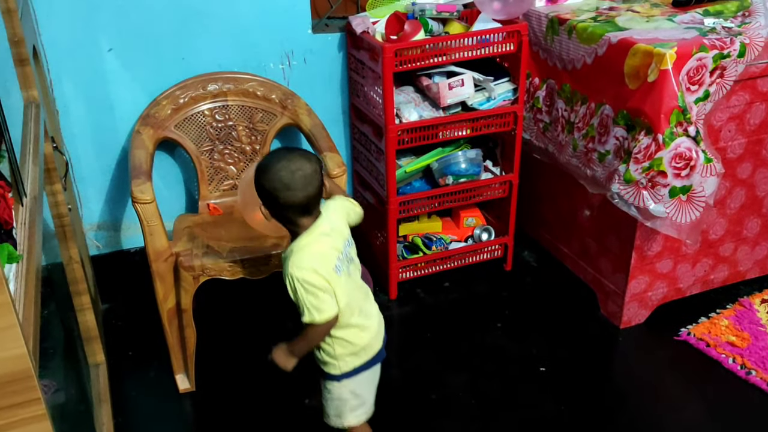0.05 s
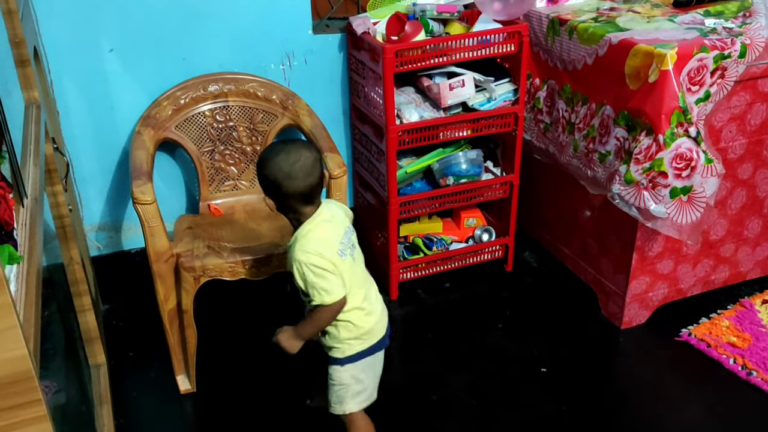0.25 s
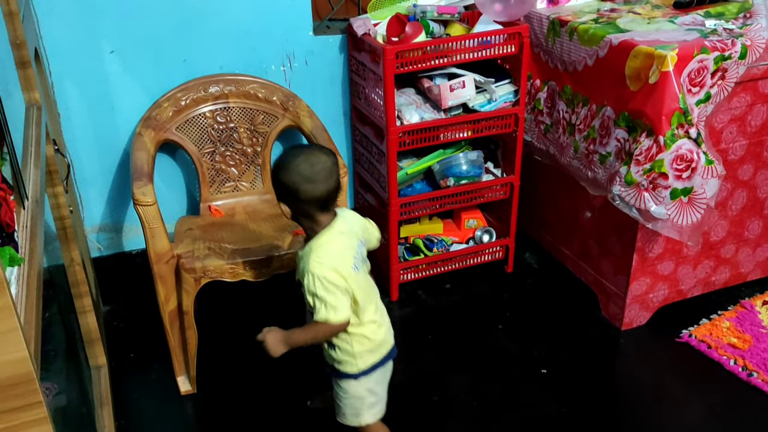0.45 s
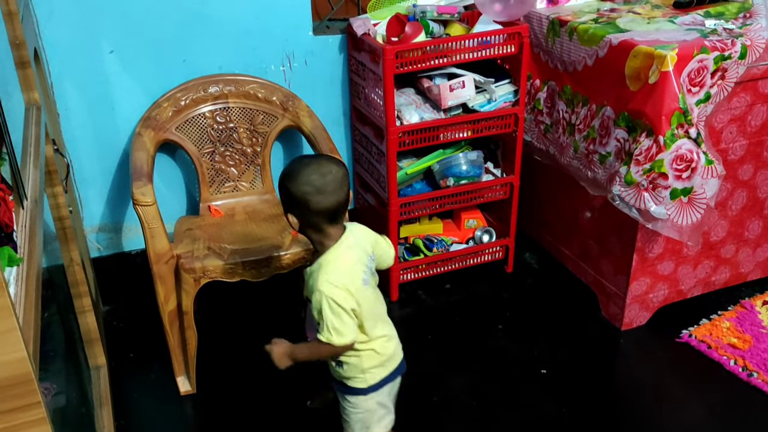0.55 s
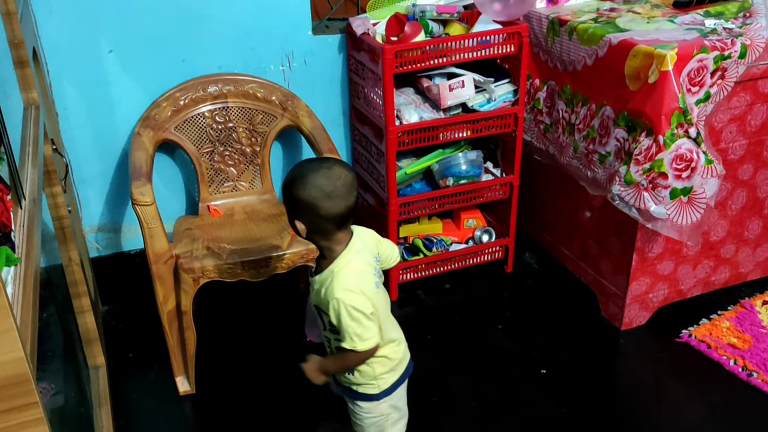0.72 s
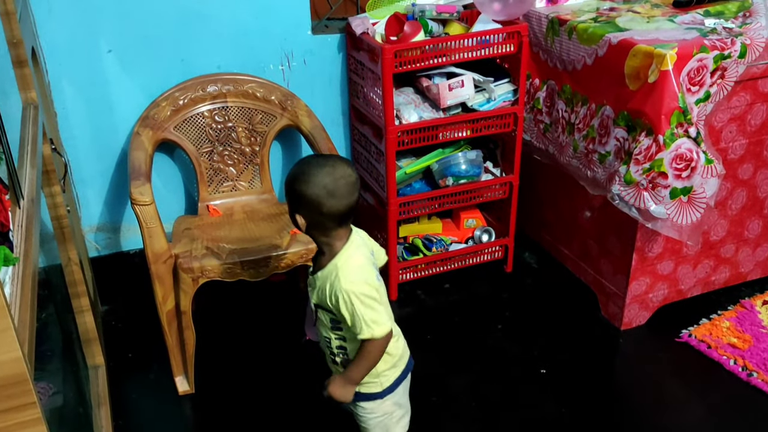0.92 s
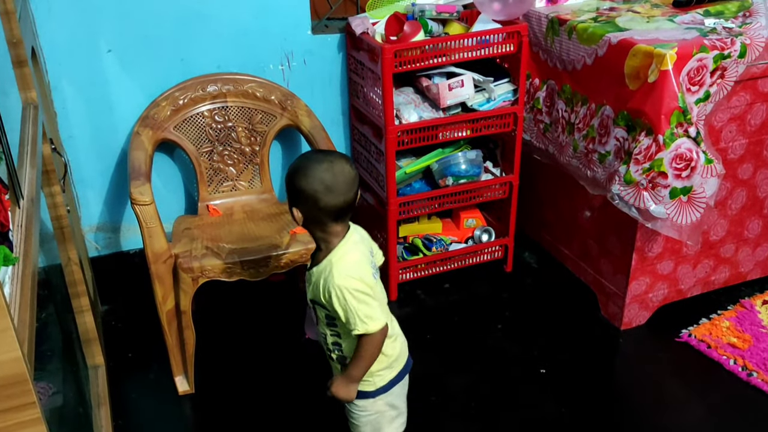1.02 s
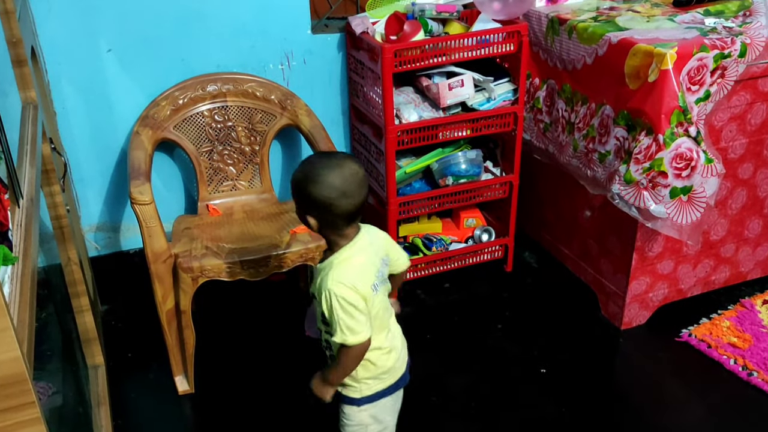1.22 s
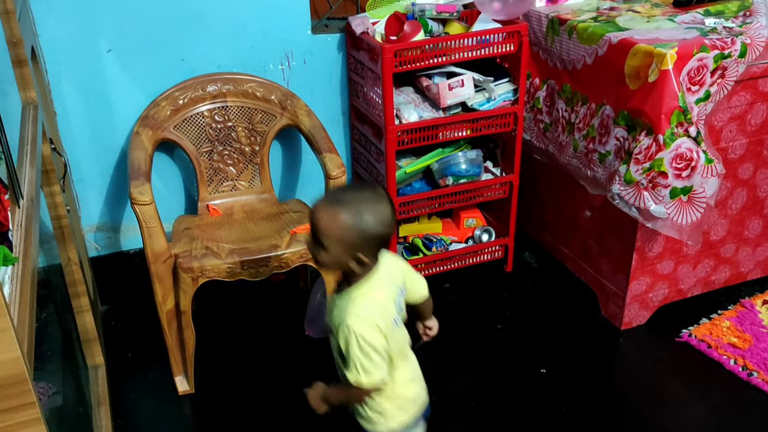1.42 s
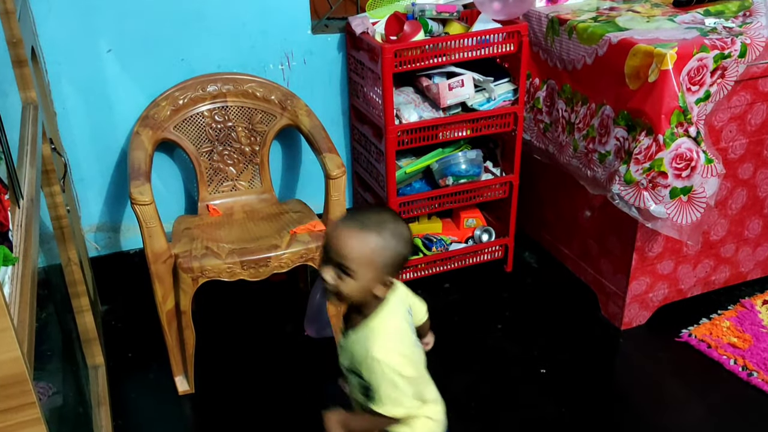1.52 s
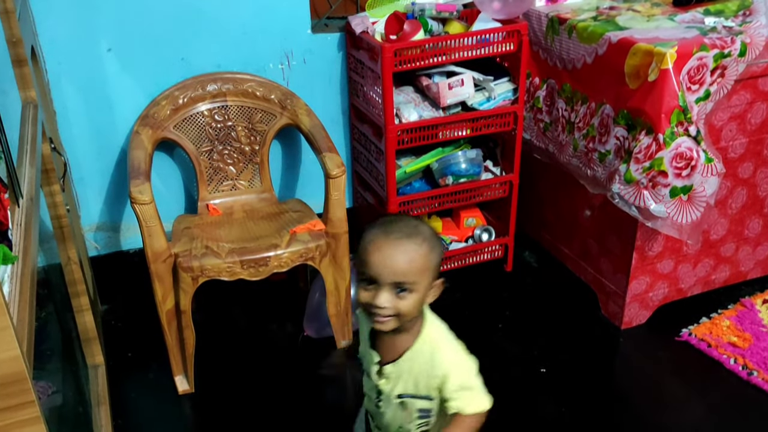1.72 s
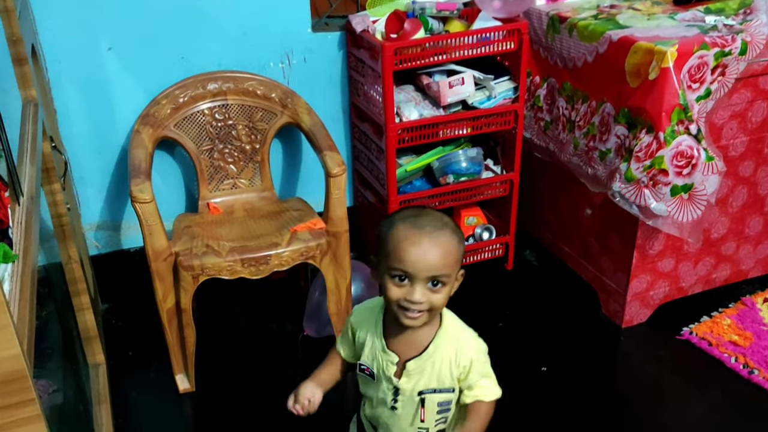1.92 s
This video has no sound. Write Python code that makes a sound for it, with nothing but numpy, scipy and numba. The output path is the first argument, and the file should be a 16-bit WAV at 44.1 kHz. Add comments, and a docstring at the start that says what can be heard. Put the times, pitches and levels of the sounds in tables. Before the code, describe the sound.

A balloon bursts at about 0.2 seconds with one loud, sharp bang, close enough to overload the microphone slightly. The bang rings in a small, hard-walled room and dies away by about 1 second. Faint clothing rustle follows and lasts until the end, near 2 seconds, with one small sharp tap slightly to the right at about 1.6 seconds. A faint hum and hiss run throughout.

```python
"""Balloon burst in a small room

A balloon bursts by a plastic chair in a small, hard-walled room, close to a phone. The skin cracks,
the freed air swings, and reflections and standing waves prolong the bang. The microphones overload,
and a limiter holds the level before it dies away. A faint hum and hiss go on throughout;
a child turns round with a rustle and one small sharp tap."""
import sys
import numpy as np
from scipy import signal
from scipy.fft import rfft, irfft
from scipy.io import wavfile
from scipy.ndimage import uniform_filter1d
from numba import njit

SR = 44100
rng = np.random.default_rng(int(sys.argv[2]) if len(sys.argv) > 2 else 0)


def to_wav(sig):
    """Store sig (one row per channel, or 1-D mono) as 16-bit WAV at the path in sys.argv[1].

    Samples outside -1..1 are clipped; the rate is SR.
    """
    pcm = np.clip(np.atleast_2d(sig), -1, 1) * 32767
    pcm = np.round(pcm).astype(np.int16)
    wavfile.write(sys.argv[1], SR, pcm.T)  # frames by channels


N = 85995

# Spectral densities, shape only: frequency_hz, level_db
HISS_SPECTRUM = [(25, 0), (60, -3.5), (110, -0.5), (160, 2), (300, 5.5), (420, -3.5), (700, -18),
                 (1300, -26), (2500, -27), (4500, -23), (7000, -15.5), (9000, -17), (10500, -42),
                 (15500, -35)]
RUSTLE_SPECTRUM = [(80, -1.5), (250, 8.5), (600, -3), (1300, -3.5), (3000, -3.5), (5000, -2.5), (8500, 1.5),
                   (10500, -18), (15500, -26.5)]
CRACK_SPECTRUM = [(200, -9), (2500, -4), (8000, -20), (15500, -17.5)]
EARLY_SPECTRUM = [(25, -0.5), (65, -1), (90, -6), (140, 2), (300, 3.5), (480, 3), (650, -13.5), (1100, 1),
                  (1900, 2), (2300, -1), (2750, 3), (3600, -28.5), (7000, -24), (15500, -35)]
BANG_REVERB_SPECTRUM = [(30, -17.5), (90, -22), (160, -7.5), (280, -2.5), (430, 1.5), (580, -2.5), (780, 2),
                        (1200, -7), (2600, -6.5), (4200, -8), (6500, -3.5), (9000, -5), (10200, -24),
                        (15500, -32)]
TAP_SPECTRUM = [(100, -18), (1000, -16), (2200, -10), (3500, 3), (5500, 7), (8000, 4), (10000, -17),
                (15500, -30)]
TAP_REVERB_SPECTRUM = [(100, -10), (800, -14), (1500, -6), (3500, 2), (5500, 0), (8500, 2.5), (10000, -13),
                       (15500, -35)]
# Partials of an appliance's hum: pitch_hz, level_db
HUM_PARTIALS = [(156, -59.5), (274.5, -81.5), (303, -71.5)]
# Envelope of the rustle: time_s, level_db
RUSTLE_ENVELOPE = [(0, -69.5), (.7, -56), (.93, -54.5), (1.08, -57), (1.299, -63), (1.401, -61),
                   (1.47, -56.5), (1.54, -56), (1.68, -55), (1.8, -56), (1.91, -52), (1.95, -52.5)]
# Standing waves of the room: pitch_hz, level_db, t60_s
NORMAL_MODES = [(277, -23, 0.96), (300.9, -17.5, 0.93), (358, -16, 0.59), (408.6, -12, 0.71),
                (686.5, -17, .7), (745, -14, 0.72), (818, -17, 0.57), (1149, -27.5, 0.81),
                (1459, -22, 0.71), (1813, -20, 0.45), (2760, -23, 0.51)]
# Reverberation time of the room: frequency_hz, t60_s
REVERB_TIMES = [(60, 1.01), (150, 0.99), (300, .85), (700, 0.74), (2000, .68), (5000, 0.87), (8000, 0.77),
                (14000, 0.48)]
# Balance of the diffuse field: frequency_hz, left_over_right_db
FIELD_BALANCE = [(60, 10.5), (200, 4), (400, 4.5), (800, 2), (1500, 1.5), (3000, 0), (15000, -2.9)]
# Resonances of the left and right microphone ports: frequency_hz, width_hz, lift_db
PORT_RESONANCES = [(8620, 1300, 6.5), (7300, 400, 9)]
# Frequency response of the phone: frequency_hz, gain_db
PHONE_RESPONSE = [(30, 4), (100, -2), (250, -0.5), (500, -0.5), (800, 0.5), (2600, 0.5), (4300, -1),
                  (6500, -2), (9000, 0), (10300, 1.5), (15500, 0)]

BURST_S, TAP_S, ROOM_RISE_S = .218, 1.5594, .001
PORT_SPACING_M, SOUND_SPEED_M_S, BASS_COHERENCE = .15, 343, .75
OVERLOAD_DB, CUTOFF_HZ = -14, 15500
LIMIT_DB, LIMIT_RATIO, LIMIT_ATTACK_S, LIMIT_RELEASE_S, LOOKAHEAD_S = -7.5, 13, .000098, .2, .0003
BINS_HZ = np.arange(N // 2 + 1) * SR / N
TIME_S = np.arange(N) / SR


def undb(db):
    """Amplitude grows tenfold for every 20 dB."""
    return 10 ** (np.asarray(db) / 20)


def unit_rms(x):
    """Normalisation to unit mean power."""
    return x / np.sqrt(np.mean(x ** 2))


def pan(left_over_right_db):
    """A level difference between the channels gives direction."""
    return undb(np.array([[.5], [-.5]]) * left_over_right_db)


def curve(table):
    """Interpolation of a table at each bin, on a logarithmic frequency axis."""
    hz, values = np.array(table, float).T
    return np.interp(np.log(np.maximum(BINS_HZ, 1)), np.log(hz), values)


def since(start_s):
    """Seconds elapsed from an onset, zero before it."""
    return np.maximum(TIME_S - start_s, 0)


def drift(rate_hz):
    """Smoothed random steps give a slow fluctuation of unit rms."""
    hold = int(SR / rate_hz)
    steps = np.repeat(rng.standard_normal(N // hold + 1), hold)
    return unit_rms(uniform_filter1d(uniform_filter1d(steps, hold), hold)[:N])


def diffuse_field(spectrum):
    """Sound from all sides: coherence between two ports falls with frequency as a sinc function."""
    coherence = BASS_COHERENCE * np.sinc(2 * BINS_HZ * PORT_SPACING_M / SOUND_SPEED_M_S)
    mid, side = np.exp(2j * np.pi * rng.random((2, len(BINS_HZ))))
    pair = mid * np.sqrt(1 + coherence) + side * np.sqrt(1 - coherence) * np.array([[1], [-1]])
    return unit_rms(irfft(pair * undb(curve(spectrum)) * pan(curve(FIELD_BALANCE)), N))


def hum():
    """An appliance's partials waver by random amplitude and phase modulation."""
    tones = 0
    for hz, db in HUM_PARTIALS:
        amplitude = np.sqrt(2) * undb(db + 5.5 * drift(rate_hz=12))
        tones += amplitude * np.sin(2 * np.pi * hz * TIME_S + .43 * drift(rate_hz=8.7))
    return tones * pan(3)


def hiss():
    """The room's background noise is a stationary diffuse field."""
    return undb(-55) * diffuse_field(HISS_SPECTRUM)


def rustle():
    """Friction of clothes and bare feet makes uneven noise as the child flinches and turns."""
    level_db = np.interp(TIME_S, *np.array(RUSTLE_ENVELOPE).T)
    return diffuse_field(RUSTLE_SPECTRUM) * undb(level_db + .29 * drift(rate_hz=39.92))


def crack(start_s, spectrum, decay_s):
    """A brief transient is broadband: a noise pulse, coloured by what it rings in."""
    age = since(start_s)
    pulse = rng.standard_normal((2, N)) * (age > 0) * np.exp(-age / decay_s)
    energy = np.sum(pulse ** 2, axis=1, keepdims=True)
    pulse *= np.sqrt(decay_s * SR / 2 / energy)
    return irfft(rfft(pulse) * unit_rms(undb(curve(spectrum))), N)


def build_up(age):
    """Reflected sound rises exponentially as the room fills."""
    return 1 - np.exp(-age / ROOM_RISE_S)


def early_reflections(decay_s=.054):
    """The near walls return a first, quickly decaying wash of the bang."""
    age = since(BURST_S)
    return diffuse_field(EARLY_SPECTRUM) * build_up(age) * np.exp(-age / decay_s)


def standing_waves():
    """The burst excites damped normal modes, each in a different phase at the two ports."""
    age = since(BURST_S)
    modes = 0
    for hz, db, t60 in NORMAL_MODES:
        spread_cycles = 2 * hz * PORT_SPACING_M / SOUND_SPEED_M_S
        phase = rng.random() + rng.random((2, 1)) * spread_cycles
        modes += undb(db) * np.sin(2 * np.pi * (hz * age + phase)) * undb(-60 * age / t60)
    return modes * build_up(age) * pan(2)


def reverberation(start_s, spectrum, t60_scale=1):
    """Dense reflections decay exponentially, each band at its own rate."""
    field, age = rfft(diffuse_field(spectrum)), since(start_s)
    centres_hz = np.array(REVERB_TIMES)[:, 0]
    tail = 0
    for hz, t60 in REVERB_TIMES:
        band = curve(np.c_[centres_hz, centres_hz == hz])  # 1 here, 0 at the neighbouring centres
        tail += irfft(field * band, N) * undb(-60 * age / (t60 * t60_scale))
    return tail * build_up(age)


def air_puff(pitch_hz=570, decay_s=.0012, lag_s=.0018):
    """The freed air swings out and in as a heavily damped oscillator."""
    age = since(BURST_S + lag_s)
    return undb(15) * np.sin(2 * np.pi * pitch_hz * age) * np.exp(-age / decay_s)


def balloon():
    """Impulse excitation: the rubber tears, the air leaps out, and the room rings."""
    tear = undb(20) * crack(BURST_S, CRACK_SPECTRUM, decay_s=.00057)
    room = early_reflections() + standing_waves() + reverberation(BURST_S, BANG_REVERB_SPECTRUM)
    return tear + air_puff() + room


def tap():
    """A small hard tick is heard as direct sound from the right and as reverberation."""
    direct = undb(-30.5) * crack(TAP_S, TAP_SPECTRUM, decay_s=.00089) * pan(-4.5)
    return direct + undb(-47) * reverberation(TAP_S, TAP_REVERB_SPECTRUM, t60_scale=.62)


def scene():
    """The pressures of all sources add at the phone by superposition."""
    return balloon() + tap() + rustle() + hum() + hiss()


def port_resonance(x, hz, width_hz, lift_db):
    """Resonance in a microphone's sound port lifts a narrow treble band."""
    ringing = signal.lfilter(*signal.iirpeak(hz, hz / width_hz, SR), x)
    return x + (undb(lift_db) - 1) * ringing


@njit
def follow_envelope(x, attack_s, release_s):
    """A one-pole level detector rises quickly and falls slowly."""
    envelope, level = np.empty(len(x)), 0.
    for i in range(len(x)):
        level += (x[i] - level) / (SR * (attack_s if x[i] > level else release_s))
        envelope[i] = level
    return envelope


def limiter(x):
    """Compression: both channels are turned down when the louder one passes the threshold."""
    level = follow_envelope(np.abs(x).max(axis=0), LIMIT_ATTACK_S, LIMIT_RELEASE_S)
    level_ahead = np.interp(TIME_S + LOOKAHEAD_S, TIME_S, level)
    excess = np.maximum(level_ahead / undb(LIMIT_DB), 1)
    return x * excess ** (1 / LIMIT_RATIO - 1)


def record(dry):
    """The microphones saturate and resonate; the phone colours, limits and low-passes the sound."""
    saturated = undb(OVERLOAD_DB) * np.arcsinh(dry / undb(OVERLOAD_DB))
    ported = np.array([port_resonance(x, *port) for x, port in zip(saturated, PORT_RESONANCES)])
    coloured = irfft(rfft(ported) * undb(curve(PHONE_RESPONSE)), N)
    low_pass = signal.ellip(8, .2, 70, CUTOFF_HZ, fs=SR, output="sos")
    return signal.sosfilt(low_pass, limiter(coloured))


dry = scene()
out = record(dry)
to_wav(out)
```